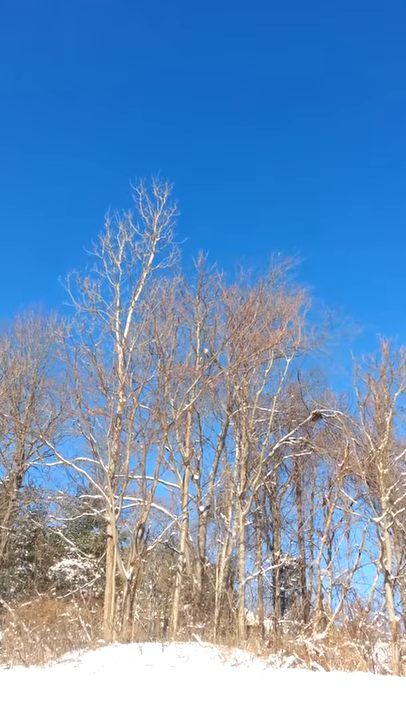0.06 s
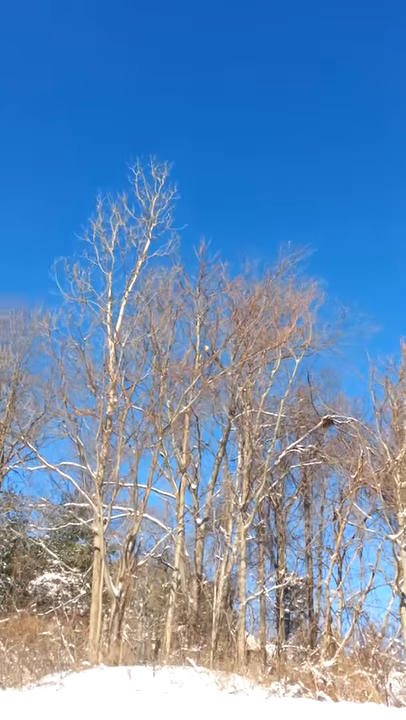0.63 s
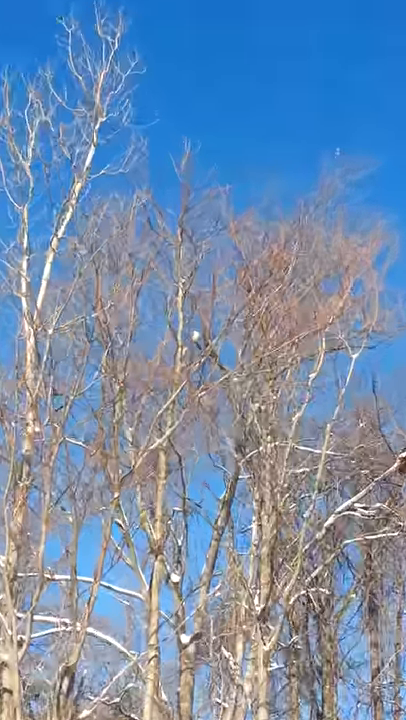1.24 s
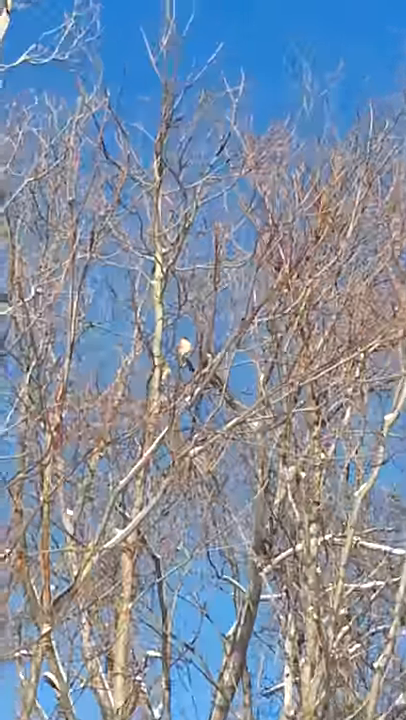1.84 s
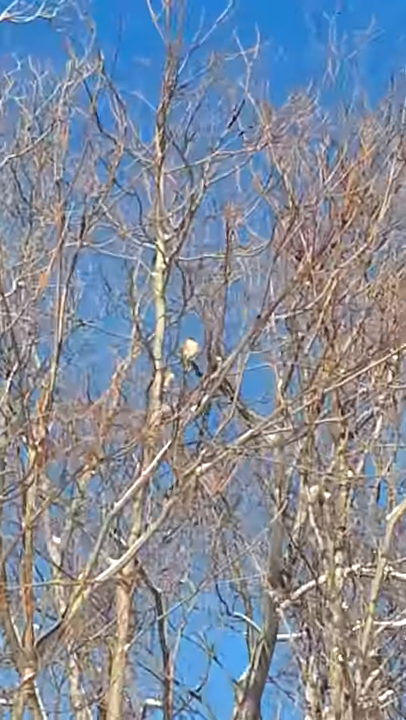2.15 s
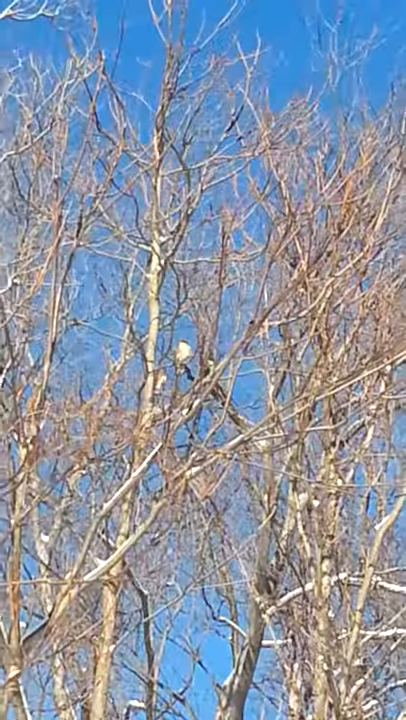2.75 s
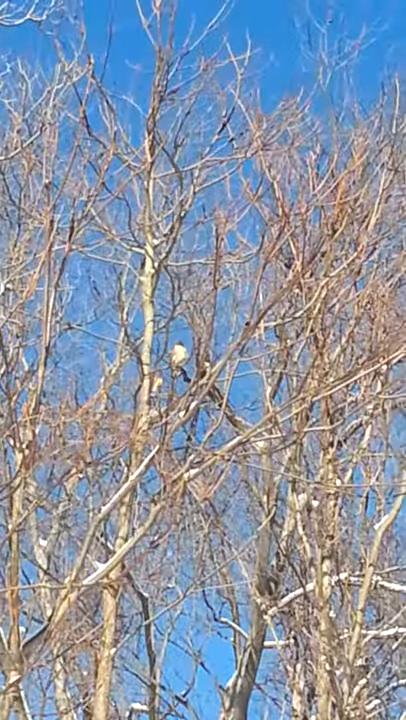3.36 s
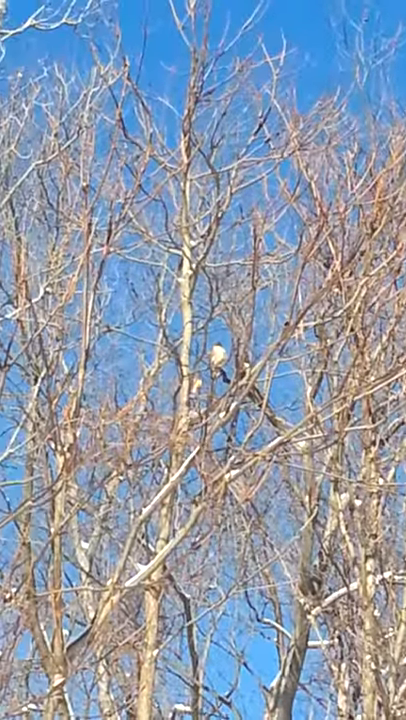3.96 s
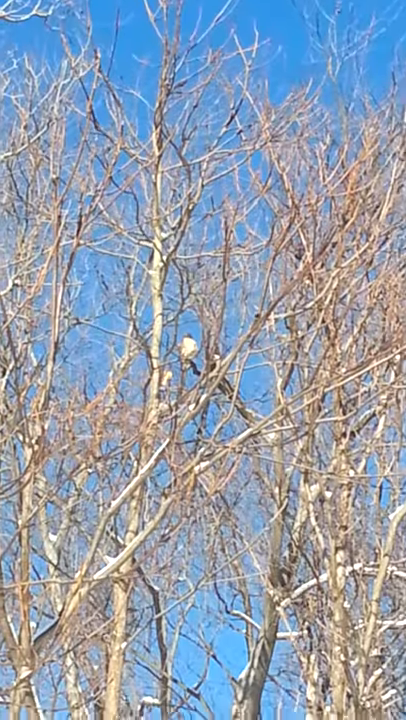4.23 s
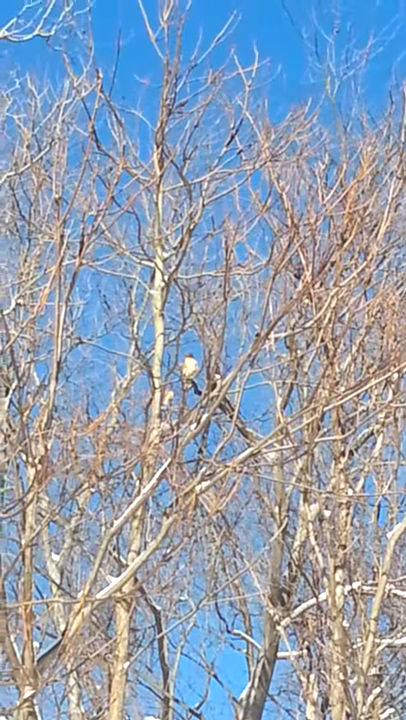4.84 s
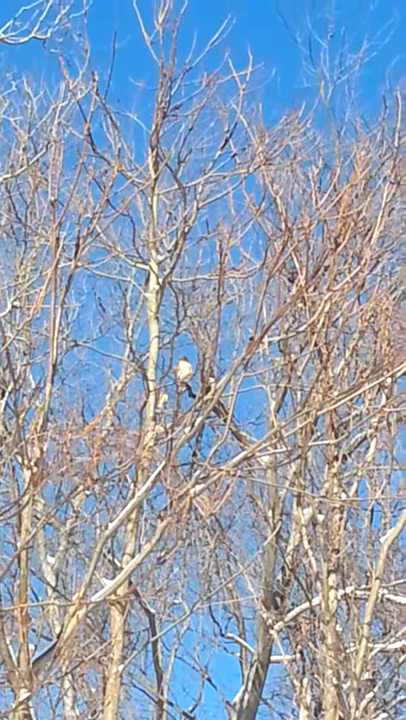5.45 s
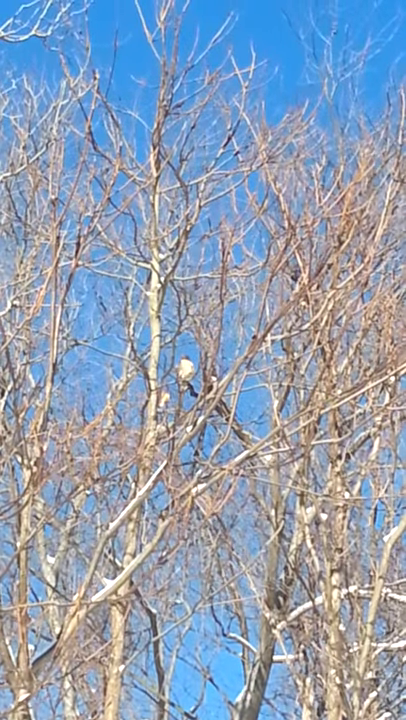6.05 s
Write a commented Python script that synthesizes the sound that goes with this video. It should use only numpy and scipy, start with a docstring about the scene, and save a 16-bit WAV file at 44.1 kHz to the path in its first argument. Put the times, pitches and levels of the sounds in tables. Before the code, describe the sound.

A hawk calls in a bare winter wood, heard almost entirely on the right of a hand-held microphone, over faint, steady air hiss. The clipped tail of an earlier cry and a small finger tick open the sound. Five screams follow, at about 0.5, 1.5, 2.6, 3.9 and 5.1 seconds, each lasting 0.7 to 0.8 seconds. Each scoops up to a shrill high note, cracks down through three sagging lower steps and frays into a rasp; the last two are slightly lower. Twigs and trunks add a short, scattered echo. Fingers tick and bump on the microphone at 2.5 seconds. A very faint rising chirp comes at 3.3 seconds, and a soft hiss swells and fades around 3.5. Dull bumps and brief rubbing touch the left side from 3.9 to 4.2 seconds. The last cry fades at about 5.9 seconds.

```python
"""A hawk screams five times in a bare winter wood, just after the end of an earlier cry.
Each cry scoops up to a high note, cracks down through three sagging registers and frays away.
Twigs and trunks scatter it back; it reaches a hand-held camera almost only at the right port.
Fingers tick and bump on the case and rub the left port, over faint air noise.
A soft hiss and one faint chirp come near the end of the third cry."""
import sys
import numpy as np
from scipy import signal
from scipy.fft import rfft, irfft, next_fast_len
from scipy.io import wavfile
from scipy.ndimage import uniform_filter1d

SR = 44100
rng = np.random.default_rng(int(sys.argv[2]) if len(sys.argv) > 2 else 0)


def master(y):
    """Save y as 16-bit WAV."""
    cut = np.clip(np.atleast_2d(y).T, -1, 1)
    pcm = np.round(cut * 32767)  # scale
    wavfile.write(sys.argv[1], SR, pcm.astype(np.int16))


N = 273420
TIME_S = np.arange(N) / SR

# cries: first note t/s, its f/Hz, relative high-note level/dB, treble bite, shrill resonance f/Hz,
# release t/s, end t/s
CRIES = [(.468, 1530, -30, -6, 6000, 1.087, 1.132), (1.548, 1514, -30.5, 1, 6020, 2.179, 2.225),
         (2.639, 1516, -30.5, 1, 6100, 3.4, 3.465), (3.909, 1473, -32.5, -0.5, 7230, 4.585, 4.67),
         (5.077, 1475, -32, 3, 7396, 5.766, 5.905)]
# high-note pitch curve per cry: t/s, f/Hz
HIGH_NOTES = [
    [(0.512, 1750), (0.552, 1757), (0.568, 1688), (0.59, 1710)],
    [(1.588, 1815), (1.598, 1832), (1.658, 1779), (1.68, 1733)],
    [(2.68, 1795), (2.714, 1806), (2.754, 1774), (2.775, 1772)],
    [(3.938, 1724), (3.978, 1624), (4.08, 1701), (4.116, 1663), (4.132, 1590), (4.18, 1586)],
    [(5.108, 1726), (5.132, 1635), (5.244, 1694), (5.254, 1667), (5.288, 1653), (5.345, 1576)],
]
# three register breaks per cry: t/s, landing f/Hz, relative level/dB, roughness 0-1
CRACKS = [
    [(.606, 1334, -24.5, 0.14), (.694, 1125, -31.5, 0.13), (.856, 968, -34, 0.11)],
    [(1.708, 1311, -26, 0.08), (1.801, 1112, -31.5, 0.19), (1.897, 971.7, -35.5, 0.12)],
    [(2.801, 1302, -26, 0.12), (2.888, 1094, -33, 0.19), (3.03, 954, -35.5, 0.13)],
    [(4.203, 1220, -31, 0.24), (4.287, 987, -33.5, 0.08), (4.374, 873.3, -32, 0.01)],
    [(5.375, 1216, -29.5, 0.18), (5.445, 1008, -33.5, 0.07), (5.512, 884.7, -32, 0.02)],
]
# middle, low, lowest register: pitch sag/(1/s), mid-note swell/dB
REGISTERS = [(.5, 4.5), (.56, 0), (.46, -.5)]
# throat response, beak half and wide open: f/Hz, gain/dB
THROAT_HALF = [(600, -17.5), (900, -11.5), (1250, -18), (1750, -6), (2150, -2.5), (2550, 3.5), (2950, -7.5),
               (3500, -19), (4300, -27), (5000, -24.5), (5700, -30), (6450, -38.5), (7100, -39),
               (8500, -34), (11000, -57.5), (14000, -42.5)]
THROAT_WIDE = [(900, 0), (1400, -13), (1750, -2.5), (3050, 4), (3550, -2), (4600, -20.5), (5300, -20),
               (6700, -24.5), (8500, -24), (10200, -31), (11800, -41), (14000, -38)]
# breath spectrum, beak half and wide open: f/Hz, relative density/dB
RASP_HALF = [(400, -47), (900, -15), (1400, 2.5), (2000, -30), (2550, 12.5), (3200, -3), (4400, -14),
             (6200, -10), (9000, -24), (12000, -50)]
RASP_WIDE = [(400, -42.5), (1000, -8.5), (1700, -10.5), (2400, -2.5), (3600, -5.5), (4600, -12),
             (5700, -12.5), (9000, -18), (11000, -39), (14000, -46)]
# partial level change per unit of twinkle and of bite: f/Hz, level/dB
TWINKLE_DEPTH = [(2800, 0.31), (4500, 0.86)]
BITE_DEPTH = [(5400, 0.24), (6800, 0.56)]
# trunk echoes: delay/s, gain/dB
TRUNK_ECHOES = [(.012, -20), (.021, -13.5), (.029, -10.5), (.044, -20.5), (.066, -19), (.091, -21),
                (.128, -24)]
# path from the hawk to the left port: f/Hz, gain/dB
LEFT_MUFFLE = [(900, -56.5), (1700, -25), (2400, -28), (3500, -31), (6000, -42), (12000, -38)]
# still air and microphone hiss per port: f/Hz, relative density/dB
AIR_LEFT = [(20, -6.5), (45, -3.5), (70, 3.5), (130, -3), (250, -6), (450, -11), (1000, -17.5), (2500, -23),
            (4500, -24.5), (6200, -30.5), (9000, -26), (14500, -26)]
AIR_RIGHT = [(20, -10), (45, -7), (70, -6.5), (130, -1), (230, 1), (450, -4.5), (1200, -6), (2200, -12.5),
             (3500, -16.5), (6200, -22.5), (9000, -20.5), (14500, -24)]
# finger ticks: t/s, right peak level/dB, grit decay/s, tilt/(dB/octave), left re right/dB
FINGER_TICKS = [(0.0539, -9.5, 0.00051, 4.5, -17.5), (0.296, -21.5, 0.00022, 39, -20),
                (2.5301, -27.5, .001, 1, -5), (2.532, -20.5, 0.0024, 3, -26),
                (2.5396, -21, 0.00069, 2, -19), (2.5418, -7, 0.00063, -2.5, -16.5),
                (2.556, -29.5, 0.00049, 2, -14), (2.93, -28, .0002, 4.5, -22)]
# case modes: f/Hz, relative level/dB, t60/s
CASE_MODES = [(1130, -15, 0.0244), (1930, 4.5, 0.0044), (4270, -0.5, 0.0024), (7700, -15, 0.00044),
              (11400, -28, 0.00072)]
# hand bumps: t/s, left level/dB, f/Hz, t60/s, right re left/dB
HAND_BUMPS = [(2.529, -23, 148, .02, -13.5), (2.5381, -26, 84.6, 0.106, -35.5),
              (2.5396, -22, 192, 0.018, -26), (3.8763, -22, 230, 0.0079, -22.5),
              (3.9960, -23, 184, .02, -30.5), (4.0399, -7, 283, 0.0071, -22),
              (4.0730, -24, 201, 0.0135, -28), (4.0892, -16.5, 227, 0.021, -32),
              (4.1281, -23.5, 259, 0.018, -22), (4.2150, -23.5, 304, 0.012, -14),
              (4.9960, -37, 330, 0.017, -14), (5.7780, -35, 240, 0.032, -12)]
# swelling hiss: f/Hz, relative density/dB
HISS_SPECTRUM = [(200, 1), (500, 6), (1500, 1), (5500, -4), (9500, -4), (14500, -16)]
# finger strokes over the left port: peak t/s, level/dB
RUB_STROKES = [(3.956, -42), (4.059, -26), (4.208, -38)]
# finger friction: f/Hz, relative density/dB
RUB_SPECTRUM = [(25, -40), (80, -2.5), (200, 7), (400, -1.5), (750, -8), (1500, -17.5), (3000, -23.5),
                (6000, -54.5), (10000, -30), (14500, -34)]


def amp(db):
    """Decibels to gain."""
    return 10 ** (np.asarray(db) / 20)


def unit_rms(x):
    """Scales to rms 1."""
    return x / np.sqrt(np.mean(x ** 2) + 1e-20)


def lookup(curve, hz):
    """Interpolates on a log-frequency axis."""
    curve_hz, value = np.transpose(curve)
    return np.interp(np.log(hz + 1), np.log(curve_hz), value)


def add(mix, start_s, sound):
    """Mixes a sound in at start_s."""
    part = mix[..., max(round(start_s * SR), 0):][..., :sound.shape[-1]]
    part += sound[..., :part.shape[-1]]


def shape(x, spectrum):
    """Filters N samples by a dB curve."""
    return irfft(rfft(x) * amp(lookup(spectrum, np.fft.rfftfreq(N, 1 / SR))), N)


def noise(spectrum):
    """Steady coloured noise, rms 1."""
    return unit_rms(shape(rng.standard_normal(N), spectrum))


def wander(rate_hz, size=N):
    """Random motion up to about rate_hz, rms 1."""
    padded = next_fast_len(size)
    hz = np.fft.rfftfreq(padded, 1 / SR)
    spectrum = rfft(rng.standard_normal(padded)) / (1 + (hz / rate_hz) ** 4)
    return unit_rms(irfft(spectrum, padded)[:size])


def gesture(t, first_s, first_hz, high_db, high_note, flip_s=.005, hold_s=.022, leap_s=.018):
    """Pitch, level and roughness of a cry's opening: scoop, flip to the first note, leap to the high one."""
    high_s, high_hz = np.transpose(high_note)
    knots_s = [t[0], first_s - flip_s, first_s, first_s + hold_s, first_s + hold_s + leap_s]
    hz = np.interp(t, [*knots_s[:-1], *high_s], [.54 * first_hz, .88 * first_hz, first_hz, first_hz, *high_hz])
    level_db = high_db + np.interp(t, knots_s, [-19.5, -1.95, 2.75, 5.5, 0])
    level_db -= 19 * (t - high_s.mean())  # fade in dB/s
    rough = np.interp(t, knots_s, [.847, .847, .264, .264, .15])
    return hz, level_db, rough


def descent(t, opening, cracks, release_s, end_s, slump_s=.014, slump_share=.38, crack_width_s=.014):
    """The voice slumps and cracks into each lower register; on release it drops, fades and frays."""
    hz, level_db, rough = opening
    cracks_s = [row[0] for row in cracks]
    for crack, until_s, (sag_per_s, swell_db) in zip(cracks, cracks_s[1:] + [release_s], REGISTERS):
        crack_s, landing_hz, register_db, register_rough = crack
        before, after = t < crack_s, t >= crack_s
        slump = slump_share * np.exp((t[before] - crack_s) / slump_s)
        hz[before] *= (landing_hz / hz[before][-1]) ** slump
        age_s = t[after] - crack_s
        hz[after] = landing_hz * np.exp(-sag_per_s * age_s)
        progress = np.minimum(age_s / (until_s - crack_s), 1)
        level_db[after] = register_db + swell_db * np.sin(np.pi * progress)
        rough[after] = register_rough
    cracking = sum(np.exp(-abs(t - crack_s) / crack_width_s) for crack_s in cracks_s)
    release = np.clip((t - release_s) / (end_s - release_s), 0, 1)
    hz *= 1 - .24 * release ** 1.2
    level_db -= .5 * cracking + 17 * release ** 1.1
    rough += .25 * cracking + .98 * release ** 1.18
    return hz, level_db, np.clip(rough, 0, 1)


def throat(hz, harmonic, gape, bite, shrill_hz, shrill_db=5.5, shrill_width_hz=550):
    """Gain in dB per partial: the gaping beak lifts the resonance; a shrill peak boosts passing overtones."""
    partial_hz = harmonic * hz
    # purer middle register: weaker partials above the third
    purity_db = (harmonic > 3) * np.interp(hz, [1030, 1170], [0, 4])
    gain_db = (1 - gape) * (lookup(THROAT_HALF, partial_hz) - purity_db)
    gain_db += gape * lookup(THROAT_WIDE, partial_hz)
    gain_db += bite * lookup(BITE_DEPTH, partial_hz)
    shrill = np.exp(-((partial_hz - shrill_hz) / shrill_width_hz) ** 2)
    return gain_db + (shrill_db + (1 - gape) * purity_db) * shrill


def cry(hz, level_db, rough, bite, shrill_hz, jitter_hz=330, waver_hz=130, flutter_db=1.5, twinkle=3):
    """The syrinx buzzes through the throat; roughness shakes pitch and strength and adds rasp."""
    size = len(hz)
    jitter = .0609 * rough ** 1.4 * wander(jitter_hz, size)
    waver = .00509 * wander(waver_hz, size)
    phase = 2 * np.pi * np.cumsum(hz * (1 + jitter + waver)) / SR
    # beak wide open until the high note is over
    top_ahead_hz = np.maximum.accumulate(hz[::-1])[::-1]
    gape = np.interp(top_ahead_hz, [1340, 1490], [0, 1])
    harmonic = np.arange(1, 19)[:, None]
    # each partial fades in and out on its own path through the twigs
    fading = np.array([wander(rate_hz=30, size=size) for _ in harmonic])
    twinkle_db = twinkle * lookup(TWINKLE_DEPTH, harmonic * hz) * fading
    partials = amp(throat(hz, harmonic, gape, bite, shrill_hz) + twinkle_db) * (harmonic * hz < SR / 2)
    partials /= np.sqrt((partials ** 2).sum(0) / 2)
    buzz = (partials * np.cos(harmonic * phase + rng.uniform(0, 2 * np.pi, harmonic.shape))).sum(0)
    buzz *= 1 + .3 * rough * wander(jitter_hz, size)
    rasp = gape * noise(RASP_WIDE)[:size] + (1 - gape) * noise(RASP_HALF)[:size]
    voice = np.sqrt(1 - .5 * rough ** 2) * buzz + amp(-4) * rough * rasp
    return voice * amp(level_db + flutter_db * wander(waver_hz, size)) * signal.windows.tukey(size, .02)


def linger(hz, level_db, t60_s=.42, waver_share=.0098, waver_hz=70, flutter_db=3):
    """One partial rings on briefly, wavering as it decays."""
    t = TIME_S[:SR // 7]
    phase = 2 * np.pi * np.cumsum(hz * (1 + waver_share * wander(waver_hz, len(t)))) / SR
    envelope = amp(level_db - 60 * t / t60_s + flutter_db * wander(waver_hz, len(t)))
    return np.sqrt(2) * envelope * np.sin(phase) * signal.windows.tukey(len(t), .2)


def scatter(t60_s, treble_t60_s, rise_s=.00185):
    """Impulse response of many branches: sparse taps with a separate treble decay."""
    taps = rng.standard_normal(SR) * (rng.random(SR) < 3000 / SR)
    hz, t, spectra = signal.stft(taps, SR, nperseg=256)
    band_t60_s = lookup([(2500, t60_s), (9000, treble_t60_s)], hz)[:, None]
    envelope = amp(-60 * t / band_t60_s) * (1 - np.exp(-t / rise_s))
    tail = signal.istft(spectra * envelope, SR)[1]
    return tail / np.linalg.norm(tail)


def wood_echo(voice, near_db, far_db, twigs_db=2, twigs_hz=4300):
    """Twigs blur the treble at once; trunks, near crowns and the deeper wood answer."""
    high_pass = signal.butter(6, twigs_hz, "high", fs=SR, output="sos")
    twigs = signal.sosfilt(high_pass, scatter(t60_s=.0775, treble_t60_s=.12, rise_s=.0024))
    crowns = scatter(t60_s=.13, treble_t60_s=.037)
    deep_wood = scatter(t60_s=.99, treble_t60_s=.18)
    response = amp(twigs_db) * twigs + amp(near_db) * crowns + amp(far_db) * deep_wood
    for delay_s, gain_db in TRUNK_ECHOES:
        add(response, delay_s, amp([gain_db]))
    return signal.fftconvolve(voice, response)[:N]


def hawk(gain_db=-2.02, scoop_s=.04, hold_s=.022, earlier_s=.05):
    """Cries reach the right port direct and echoed, the left only as a muffled echo."""
    voice, cries = np.zeros(N), []
    for row, high_note, cracks in zip(CRIES, HIGH_NOTES, CRACKS):
        first_s, first_hz, high_db, bite, shrill_hz, release_s, end_s = row
        t = np.arange(first_s - scoop_s, end_s, 1 / SR)
        opening = gesture(t, first_s, first_hz, high_db, high_note, hold_s=hold_s)
        hz, level_db, rough = descent(t, opening, cracks, release_s, end_s)
        cries.append(cry(hz, level_db, rough, bite, shrill_hz))
        add(voice, first_s - scoop_s, cries[-1])
        add(voice, first_s + hold_s, linger(2 * first_hz, high_db - 5))
    # the earlier cry ends like the first
    add(voice, 0, amp(3.5) * cries[0][-round(earlier_s * SR):])
    left = shape(wood_echo(voice, near_db=-2.5, far_db=-16.5), LEFT_MUFFLE)
    right = voice + wood_echo(voice, near_db=-11, far_db=-24)
    return amp(gain_db) * np.array([left, right])


def air(left_db=-54.5, right_db=-52, left_lift_db=3, right_lift_db=2.5, lead_s=.04):
    """Far rumble and hiss, independent per port, a little louder during the five cries."""
    gate = sum(1. * (TIME_S > first_s - lead_s) * (TIME_S < end_s) for first_s, *_, end_s in CRIES)
    crying = uniform_filter1d(gate, size=SR // 10)
    left = amp(left_db + left_lift_db * crying) * noise(AIR_LEFT)
    right = amp(right_db + right_lift_db * crying) * noise(AIR_RIGHT)
    return np.array([left, right])


def finger_ticks(grit=.13):
    """Tiny snaps with gritty tails ring the case."""
    out, t = np.zeros((2, N)), TIME_S[:1024]
    ring = sum(amp(db - 60 * t / t60_s) * np.sin(2 * np.pi * hz * t) for hz, db, t60_s in CASE_MODES)
    octaves = np.log2(np.clip(np.fft.rfftfreq(2 * len(t), 1 / SR), 800, 7000) / 2000)
    for start_s, peak_db, decay_s, tilt_db_per_octave, left_db in FINGER_TICKS:
        snap = (t == 0) + grit * rng.standard_normal(len(t)) * np.exp(-t / decay_s)
        spectrum = rfft(signal.fftconvolve(snap, ring), 2 * len(t))
        tick = irfft(spectrum * amp(tilt_db_per_octave * octaves))[:len(t)]
        add(out, start_s, amp([[peak_db + left_db], [peak_db]]) * tick / abs(tick).max())
    return out


def hand_bumps():
    """Dull, quickly damped pushes on the case, mostly left."""
    out, t = np.zeros((2, N)), TIME_S[:SR // 8]
    for start_s, level_db, hz, t60_s, right_db in HAND_BUMPS:
        bump = amp(-60 * t / t60_s) * np.sin(2 * np.pi * hz * t)
        add(out, start_s, amp([[level_db], [level_db + right_db]]) * bump)
    return out


def hiss(peak_s=3.5, width_s=.3, level_db=-55):
    """A soft hiss swells and fades around the end of the third cry."""
    envelope = amp(level_db) * np.exp(-((TIME_S - peak_s) / width_s) ** 2)
    return envelope * np.array([noise(HISS_SPECTRUM), noise(HISS_SPECTRUM)])


def chirp(start_s=3.275, length_s=.08, from_hz=970, to_hz=1130, level_db=-43):
    """One faint rising tone on the right, under the third cry."""
    out = np.zeros((2, N))
    hz = np.linspace(from_hz, to_hz, round(length_s * SR))
    tone = np.sin(2 * np.pi * np.cumsum(hz) / SR)
    add(out[1], start_s, amp(level_db) * np.hanning(len(hz)) * tone)
    return out


def finger_rub(grip_db_per_s=650, ease_db_per_s=208, lumps_db=3, lumps_hz=70):
    """Lumpy friction over the left port; each stroke grips fast and eases off."""
    strokes_db = [level_db - np.maximum(grip_db_per_s * (peak_s - TIME_S), ease_db_per_s * (TIME_S - peak_s))
                  for peak_s, level_db in RUB_STROKES]
    left = noise(RUB_SPECTRUM) * amp(np.max(strokes_db, axis=0) + lumps_db * wander(lumps_hz))
    return np.array([left, np.zeros(N)])


def scene():
    """Stereo mix of hawk, background and handling."""
    return hawk() + air() + finger_ticks() + hand_bumps() + hiss() + chirp() + finger_rub()


def record(dry, low_cut_hz=52, band_limit_hz=14700):
    """Bass cut and steep band limit."""
    high_pass = signal.butter(3, low_cut_hz, "high", fs=SR, output="sos")
    low_pass = signal.firwin(511, band_limit_hz, window=("kaiser", 9), fs=SR)
    return signal.oaconvolve(signal.sosfilt(high_pass, dry), low_pass[None], "same", axes=1)


dry = scene()
out = record(dry)
master(out)
```